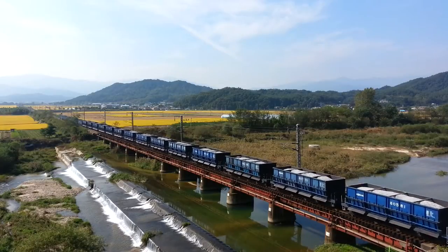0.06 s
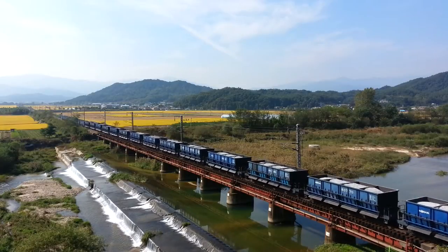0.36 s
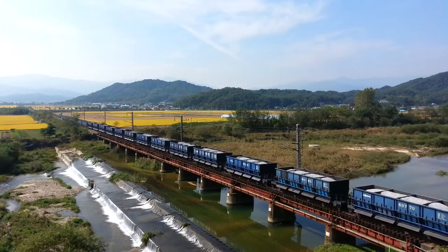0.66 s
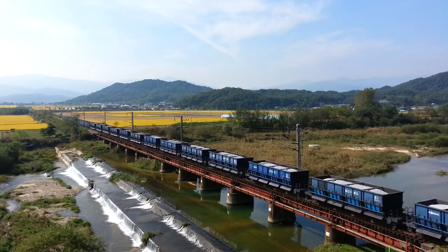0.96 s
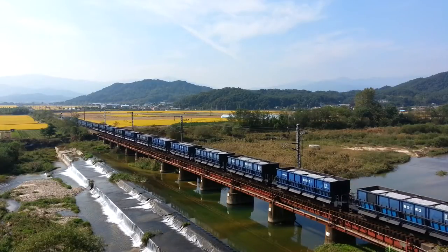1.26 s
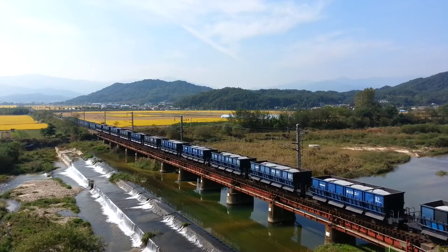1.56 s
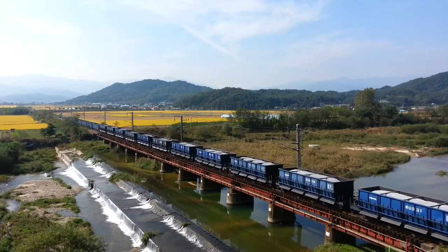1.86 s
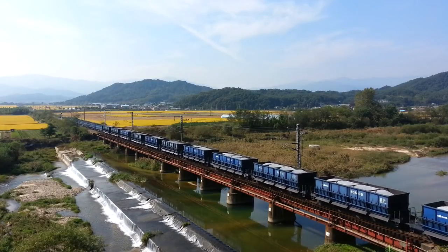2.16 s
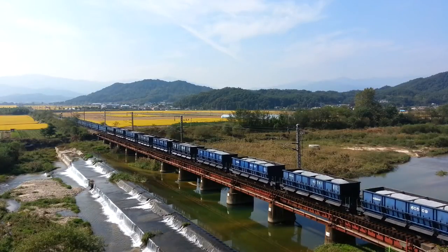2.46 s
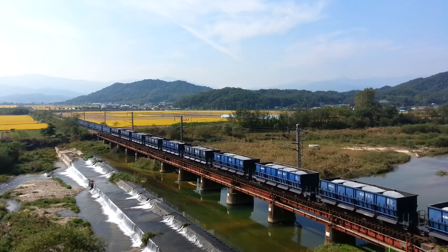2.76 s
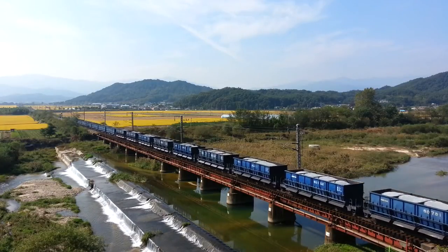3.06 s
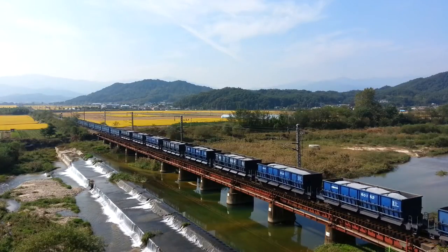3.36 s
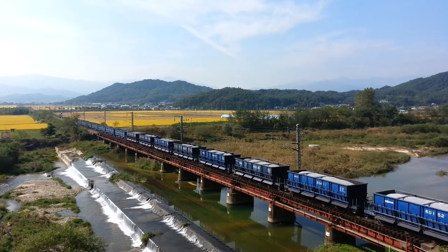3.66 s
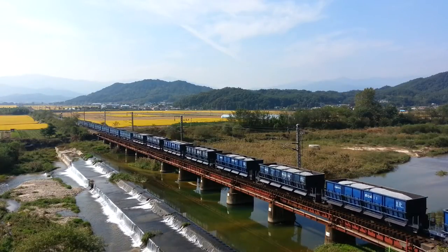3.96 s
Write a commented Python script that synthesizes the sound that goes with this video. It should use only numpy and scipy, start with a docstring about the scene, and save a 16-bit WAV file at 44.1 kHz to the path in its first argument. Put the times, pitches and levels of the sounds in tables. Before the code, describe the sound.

A freight train crosses a steel bridge, wheels roaring and clacking loudly over a rail joint.

```python
"""Freight train on a girder bridge

Beside a river weir, a close pair of microphones hears a freight train cross a steel bridge. Water rushes in the
distance. Wheels roar on the rails and make the girders drone; axle after axle knocks over one rail joint, four
to each coupling, and the wagons rattle after every knock. A low thump sounds with each knock; at this range the
loud knocks overload the recorder, and a fast limiter catches them."""
import sys
import numpy as np
from scipy import signal
from scipy.fft import rfft, irfft
from scipy.io import wavfile
from scipy.ndimage import uniform_filter1d, minimum_filter1d

SR = 44100
rng = np.random.default_rng(int(sys.argv[2]) if len(sys.argv) > 2 else 0)


def waveform_to_disk(signal):
    """Save audio, clipped to [-1, 1], as 16-bit WAV at the path in sys.argv[1]."""
    frames = np.transpose(np.atleast_2d(signal))
    scaled = np.clip(frames, -1, 1) * 32767
    samples = np.round(scaled).astype(np.int16)
    wavfile.write(sys.argv[1], SR, samples)


N = 176400

# Noise spectra of distant water and of wheels on rail: freq_hz, density_db
WEIR_SPECTRUM = [(100, -26), (200, -19), (800, -1), (2500, 0), (4500, -2.5), (6000, -6), (8000, -8),
                 (8900, -12.5), (9600, -23.5), (10500, -66), (16000, -72)]
ROAR_SPECTRUM = [(25, -40.5), (100, -53), (135, -40), (175, -27), (250, -10.5), (350, -4), (450, -1.5),
                 (620, -1.5), (800, -3), (980, -1.5), (1200, -5.5), (1900, -7), (2700, -10.5),
                 (4400, -15.5), (5800, -29.5), (9000, -51), (12000, -98)]
# Bands of the roar that surge on their own: centre_hz
SURGE_BANDS = [510, 700, 1000]
# Resonances of girders and rails: pitch_hz, half_width_hz, level_db
GIRDER_MODES = [(176, 15.7, -44), (220.5, 24, -39.5), (363, 35, -31), (490, 18, -24.5), (513.6, 10, -30.5),
                (681, 46, -29), (797, 23, -26), (880, 40, -24)]
# Load shifting on to a girder: start_s, pitch_hz, level_db
GIRDER_BOOMS = [(.045,522,-17), (.425,473,-19), (.925,480,-17), (1.24,497,-19), (2.16,458,-20),
                (2.395,481,-18), (2.955,492,-13), (3.515,535,-12.5)]
# Flanges rubbing the rail: centre_s, pitch_hz, level_db
FLANGE_SQUEAKS = [(.81, 4830, -36), (1.115, 5160, -22)]
# Loose couplings: start_s, level_db
COUPLING_CHINKS = [(.755, -34), (1.105, -35), (2.265, -37), (2.505, -33), (2.725, -33), (2.805, -33)]
# Duller knocks further along the bridge: start_s, level_db, pitch_hz
DISTANT_KNOCKS = [(.350,0.5,873), (.803,-1.5,850), (1.005,-0.5,737), (1.520,0.5,760), (1.583,2.5,866),
                  (2.600,-1,940), (3.091,-1,880), (3.558,-3.5,980), (3.715,-7.5,890)]
# Near axle knocks, each with a low thump: start_s, ring_db, pitch_hz, crash_db, click_db, thump_db (added to
# THUMP_DB)
AXLE_KNOCKS = [(.045,4,824,4,1,-5.5), (.130,-11,980,2,-7,-27.5), (.371,6,824,4.5,4,6.5),
               (.453,-11,890,-0.5,0.5,-5), (.606,2.5,780,2,1.5,-3), (.684,-8,870,-2.5,-17,-22),
               (.971,3.5,890,3.5,1.5,-9), (1.050,-2.5,820,-1,-3.5,-14), (1.201,5,793,5.5,1,-20),
               (1.284,2,970,-1.5,-21,-22), (1.564,4,770,5.5,0.5,-6), (1.642,-1,880,-0.5,-1,-15),
               (1.794,-1.5,830,2.5,-0.5,-7.5), (1.880,-1.5,766,-0.5,-20,-14), (2.121,6,766,4,1,6),
               (2.201,-5.5,787,1,-4,-12), (2.357,3.5,860,1.5,-0.5,-0.5), (2.441,-3.5,805,-1,-16,-24),
               (2.681,4.5,777,6,-3,2), (2.772,-11,845,-3,-14,-20.5), (2.918,6,873,3.5,0.5,-4),
               (2.994,-4.5,900,-0.5,-2.5,-17), (3.283,1.5,770,2.5,2.5,-2), (3.360,-2,830,-1.5,-3.5,-14.5),
               (3.513,-1,855,5.5,0,-9), (3.596,0,855,-2,-16,-11), (3.838,5.5,780,4,-3,1),
               (3.925,-3.5,810,0,-21,-12)]
# Modes of wheel and rail: pitch_hz, level_db, t60_s
WHEEL_MODES = [(532, -9, 0.12), (752.7, -3.5, 0.12), (823.5, -4, 0.089), (885, -2.5, 0.091),
               (983, -8.5, 0.19), (1129, -14.5, 0.093), (1410, -22.5, 0.03), (1887, -5.5, 0.069),
               (2150, -5.5, 0.031)]
# Spectra of the four noises in a knock: freq_hz, density_db
CLICK_SPECTRUM = [(200, -27.5), (1000, -20), (3800, 6.5), (5800, -4.5), (8000, 1.5), (9300, -5.5),
                  (10500, -14), (14000, -22), (16000, -32)]
CRASH_SPECTRUM = [(150, -42.5), (400, -24), (800, -0.5), (1200, -2), (2000, 1.5), (3000, -7), (4300, -9.5),
                  (6000, -23.5), (9000, -57)]
RATTLE_SPECTRUM = [(120, -49), (280, -20), (500, 8.5), (950, 5.5), (1300, 3.5), (2200, 2), (4300, -21),
                   (6000, -24), (8200, -20.5), (10000, -57)]
SHIMMER_SPECTRUM = [(1500, -8), (2800, 10), (4100, 8), (5800, -7), (7900, -4), (9000, -1.5), (9800, -24),
                    (11000, -64)]
# How alike the two microphones sound: freq_hz, correlation (clipped to 0-1 in use)
MIC_LIKENESS = [(60, 4), (250, 3.5), (500, 0.78), (850, 1.04), (1150, 0.72), (2200, 0.62), (2900, 0.4),
                (4100, 0.57), (5600, 0.49), (9000, -1.5)]
# Phase between the microphones: freq_hz, left_lead_rad
MIC_PHASE = [(100, 0.5), (550, 0.14), (1000, -0.96), (1800, 1.02), (2500, 0.48), (3600, 2.5), (5000, 4),
             (6100, 3), (7800, 5), (9200, 4)]
# Balance of the pair: freq_hz, left_minus_right_db
MIC_BALANCE = [(100, -0.5), (200, -1.5), (330, 0), (520, -1.9), (750, 0.5), (1000, -1.7), (1800, 0.5),
               (3000, -3.5), (4400, -2), (6000, -4), (9000, -5.5)]
# The recorder's wind filter: freq_hz, gain_db
WIND_FILTER = [(100, -6.5), (170, 0)]

WEIR_DB, ROAR_DB, ROAR_FLUTTER_DB, SURGE_DB = -29.5, -12, 0.95, 0.66
SING_HZ, SING_DB, SING_FADE_DB_PER_S = 7793, -45.5, 5
CLICK_DB, CLICK_ATTACK_S, CLICK_T60_S, CLICK_LEAD_S = -18, 0.0061, 0.064, 0.0034
CRASH_DB, CRASH_ATTACK_S, CRASH_T60_S, FAR_CRASH_DB = -12, 0.0022, 0.12, -3
RATTLE_DB, RATTLE_ATTACK_S, RATTLE_T60_S = -15, 0.0066, 0.67
SHIMMER_DB, SHIMMER_T60_S = -29.5, 0.54
THUMP_DB, THUMP_HZ, THUMP_RISE_S = -24, 56, 0.0034
RING_DB, RING_SCATTER_DB, RING_DETUNE = -10, 1, 0.011
FOCUS_DB, FOCUS_WIDTH_HZ = 7, 70  # lift of the modes near a knock's pitch
DUCK_DB, DUCK_RELEASE_S, LIMITER_SAMPLES, TOP_CUT_HZ = 1, 0.066, 7, 15800

TIME_S = np.arange(N) / SR
BIN_HZ = np.maximum(np.arange(N // 2 + 1) * SR / N, 1)


def undb(db):
    """Decibels to gain."""
    return 10 ** (np.asarray(db) / 20)


def curve(points):
    """Join (freq_hz, value) points on a log-frequency axis."""
    hz, value = np.array(points, float).T
    return np.interp(np.log(BIN_HZ), np.log(hz), value)


def resonance(hz, half_width_hz):
    """Gain around one resonance."""
    return 1 / (1 + ((BIN_HZ - hz) / half_width_hz) ** 2)


def noise(gain):
    """Stereo noise of rms 1 with this spectrum, less alike left and right towards the treble."""
    alike = np.clip(curve(MIC_LIKENESS), 0, 1)
    mid, side = rfft(rng.standard_normal((2, N))) * gain * np.sqrt([1 + alike, 1 - alike])
    pair = irfft(np.array([mid + side, mid - side]), N)
    return pair / pair.std()


def band_noise(spectrum):
    """Stereo noise coloured by a spectrum table."""
    return noise(undb(curve(spectrum)))


def wander(rate_hz):
    """Smooth random drift with spread 1."""
    drift = irfft(rfft(rng.standard_normal(N)) * resonance(0, rate_hz), N)
    return (drift - drift.mean()) / drift.std()


def bursts(hits, attack_s, t60_s):
    """Envelope of (start_s, level_db) blows that rise and die away; their powers add."""
    power = np.zeros(N)
    for start, db in hits:
        age = np.maximum(TIME_S - start, 0)
        power += (undb(db - 60 * age / t60_s) * np.minimum(age / attack_s, 1)) ** 2
    return np.sqrt(power)


def tone_swells(tones, rise_s):
    """A low tone swells and dies away after each start: (start_s, pitch_hz, level_db)."""
    out = np.zeros(N)
    for start, hz, db in tones:
        age = np.maximum(TIME_S - start, 0)
        out += undb(db) * age / rise_s * np.exp(1 - age / rise_s) * np.sin(2 * np.pi * hz * age)
    return out


def weir():
    """Water rushes over the weir, smoothed by distance."""
    return undb(WEIR_DB + 0.56 * wander(11)) * band_noise(WEIR_SPECTRUM)


def flanges():
    """One wheel sings thinly as it moves away; others squeak briefly against the rail."""
    out = undb(SING_DB - SING_FADE_DB_PER_S * TIME_S) * noise(resonance(SING_HZ, half_width_hz=11))
    for centre, hz, db in FLANGE_SQUEAKS:
        envelope = undb(db) * np.exp(-((TIME_S - centre) / 0.015) ** 2)
        wavering_hz = hz * (1 + 0.013 * wander(150))
        out += envelope * np.sin(2 * np.pi * np.cumsum(wavering_hz) / SR)
    return out


def girders():
    """The girders drone under the wheels and boom as the load shifts on to them."""
    drone = sum(undb(db) * noise(resonance(hz, width)) for hz, width, db in GIRDER_MODES)
    return drone + tone_swells(GIRDER_BOOMS, rise_s=0.021)


def wheel_roar():
    """Rough wheels roar and surge on the rails."""
    roar = undb(ROAR_DB + ROAR_FLUTTER_DB * wander(19)) * band_noise(ROAR_SPECTRUM)
    bands = [irfft(rfft(roar) * resonance(hz, hz / 6), N) for hz in SURGE_BANDS]
    return roar + sum((undb(SURGE_DB * wander(10)) - 1) * band for band in bands)


def couplings():
    """Loose steel parts chink between the axle blows."""
    envelope = bursts(COUPLING_CHINKS, CLICK_ATTACK_S, t60_s=0.16)
    return envelope * noise(resonance(7670, 900) ** 2)


def knock_thumps():
    """A low thump sounds with each near knock, at the level listed for that knock."""
    thumps = [(start, THUMP_HZ, THUMP_DB + db) for start, *_, db in AXLE_KNOCKS]
    return tone_swells(thumps, THUMP_RISE_S)


def wheel_rings():
    """Each knock, near or far, rings the modes of wheel and rail, every wheel a little differently."""
    out = np.zeros(N + SR)
    age = np.arange(SR // 2) / SR
    attack = np.minimum(age / CRASH_ATTACK_S, 1)
    for start, knock_db, pitch, *_ in AXLE_KNOCKS + DISTANT_KNOCKS:
        first = int(start * SR)
        scatter = rng.standard_normal((len(WHEEL_MODES), 2)) * [RING_SCATTER_DB, RING_DETUNE]
        for (hz, mode_db, t60), (scatter_db, detune) in zip(WHEEL_MODES, scatter):
            focus_db = FOCUS_DB * np.exp(-((hz - pitch) / FOCUS_WIDTH_HZ) ** 2)
            decay = undb(knock_db + mode_db + focus_db + scatter_db - 60 * age / t60)
            phase = 2 * np.pi * hz * (1 + detune) * age + rng.uniform(0, 2 * np.pi)
            out[first:first + len(age)] += attack * decay * np.sin(phase)
    return undb(RING_DB) * out[:N]


def rail_joint():
    """A wheel drops into the joint: click and bogie crash; then steel shimmers and the wagon rattles."""
    clicks = [(start - CLICK_LEAD_S, db) for start, _, _, _, db, _ in AXLE_KNOCKS]
    crashes = [(start, db) for start, _, _, db, _, _ in AXLE_KNOCKS]
    far_crashes = [(start, db + FAR_CRASH_DB) for start, db, _ in DISTANT_KNOCKS]
    click = bursts(clicks, CLICK_ATTACK_S, CLICK_T60_S) * band_noise(CLICK_SPECTRUM)
    click *= undb(CLICK_DB + 3.2 * wander(250))
    crash = bursts(crashes + far_crashes, CRASH_ATTACK_S, CRASH_T60_S) * band_noise(CRASH_SPECTRUM)
    rattle = bursts(crashes, RATTLE_ATTACK_S, RATTLE_T60_S) * band_noise(RATTLE_SPECTRUM)
    rattle *= undb(RATTLE_DB + 1.1 * wander(41))
    shimmer = bursts(clicks, RATTLE_ATTACK_S, SHIMMER_T60_S) * band_noise(SHIMMER_SPECTRUM)
    return click + undb(CRASH_DB) * crash + undb(SHIMMER_DB) * shimmer + rattle


def scene():
    """Train and river at the pair: in most bands a little earlier on the left, louder on the right."""
    train = rail_joint() + wheel_rings() + couplings() + wheel_roar() + girders() + flanges()
    tilt = undb(curve(MIC_BALANCE) / 2)
    left, right = tilt * np.exp(1j * curve(MIC_PHASE)), 1 / tilt
    return irfft(rfft(train + knock_thumps() + weir()) * np.array([left, right]), N)


def record(dry):
    """The recorder ducks briefly after overloads, limits what is still too loud, and cuts bass and top."""
    overloaded = np.abs(dry).max(axis=0) > 1
    since_overload_s = TIME_S - np.maximum.accumulate(np.where(overloaded, TIME_S, -1))
    duck = signal.lfilter(*signal.butter(1, 20, fs=SR), np.exp(-since_overload_s / DUCK_RELEASE_S))
    ducked = dry * undb(-DUCK_DB * duck)
    limiter_gain = minimum_filter1d(1 / np.maximum(np.abs(ducked), 1), size=2 * LIMITER_SAMPLES - 1)
    for _ in range(2):  # round off the gain's corners
        limiter_gain = uniform_filter1d(limiter_gain, size=LIMITER_SAMPLES)
    bass_cut = irfft(rfft(ducked * limiter_gain) * undb(curve(WIND_FILTER)), N)
    return signal.sosfilt(signal.ellip(8, 0.2, 70, TOP_CUT_HZ, fs=SR, output="sos"), bass_cut)


dry = scene()
out = record(dry)
waveform_to_disk(out)
```